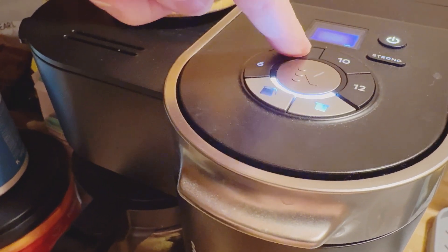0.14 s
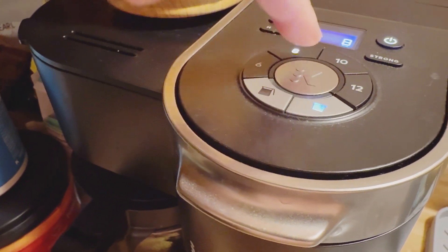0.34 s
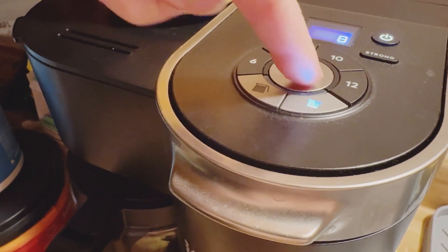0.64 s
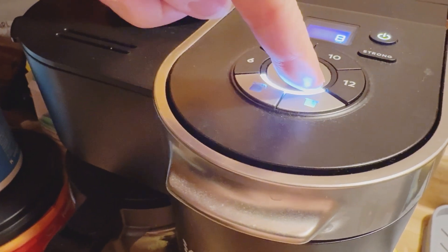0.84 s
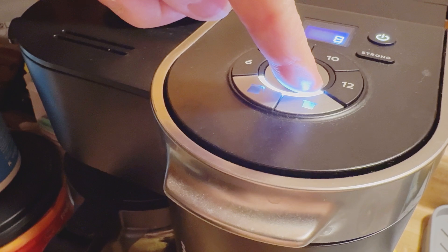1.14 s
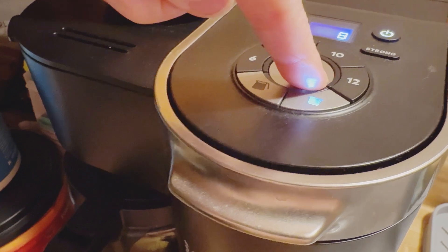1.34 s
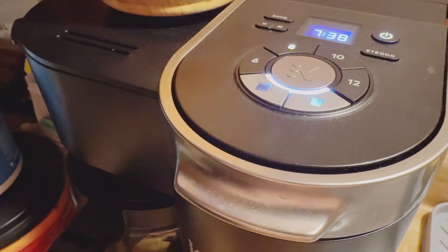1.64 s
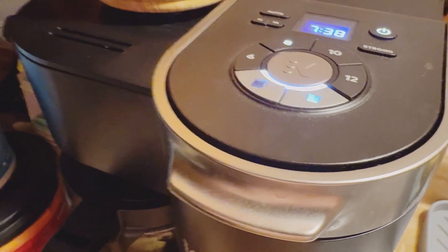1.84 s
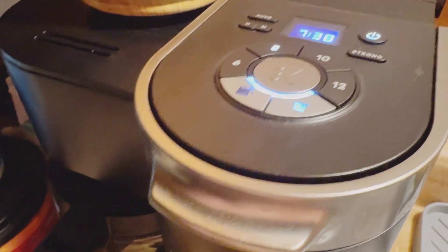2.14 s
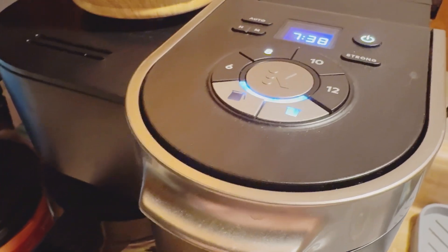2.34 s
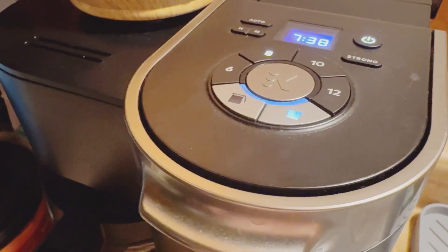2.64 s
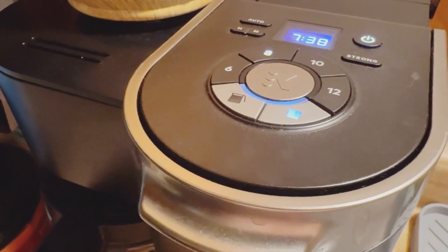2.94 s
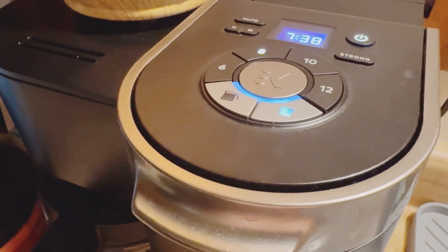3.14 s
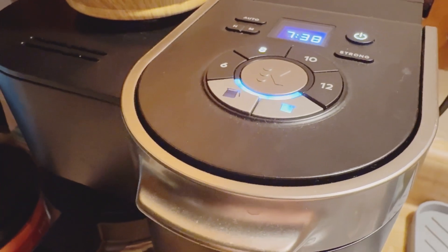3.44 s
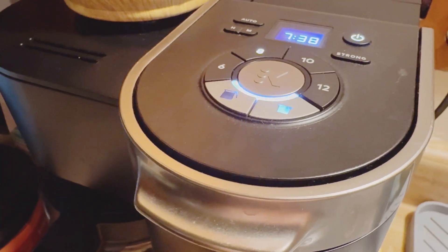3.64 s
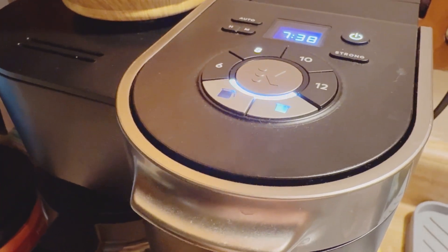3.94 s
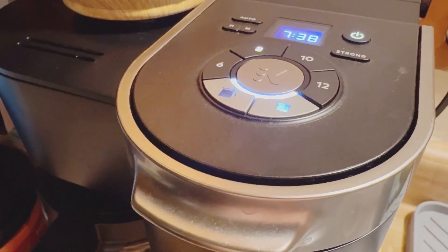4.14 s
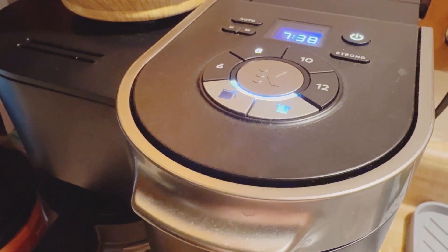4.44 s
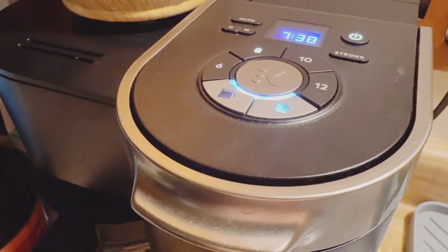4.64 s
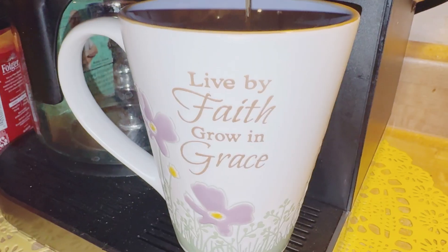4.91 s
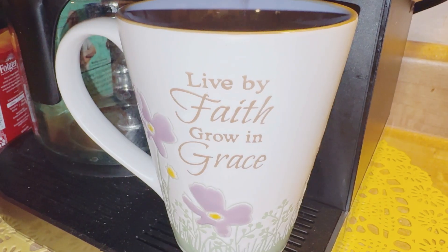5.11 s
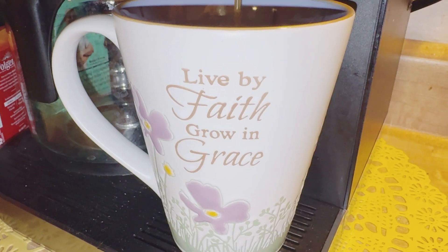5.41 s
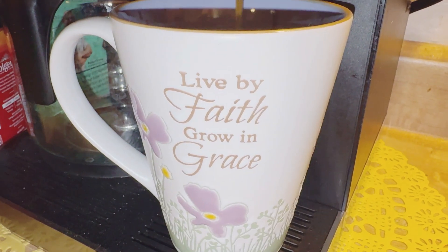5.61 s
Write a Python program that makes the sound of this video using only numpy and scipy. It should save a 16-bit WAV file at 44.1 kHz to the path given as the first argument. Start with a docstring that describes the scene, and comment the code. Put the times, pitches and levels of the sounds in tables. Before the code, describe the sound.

In a quiet kitchen with a fridge humming faintly, two buttons on a single-serve coffee machine are pressed, each snapping with a short plastic knock. A pause follows, with one very soft brush. Then the machine is abruptly brewing: its pump drones, spurts of air gurgle and hiss, and a thin stream of coffee spatters into a mug with a rising hollow note. The stereo microphone is close.

```python
"""A quiet kitchen, a stereo microphone close to a single-serve coffee machine, a fridge humming behind.
First a finger presses two buttons: the switches snap and the plastic housing rings. A soft brush follows.
Near 4.8 s, abruptly, the machine is brewing: its air pump drones, spurts of air gurgle and hiss through
the pod, and a thin stream of coffee spatters into a mug, whose hollow note climbs as it fills."""
import sys
import numpy as np
from scipy import signal
from scipy.fft import rfft, irfft, next_fast_len
from scipy.io import wavfile

SR = 44100
rng = np.random.default_rng(int(sys.argv[2]) if len(sys.argv) > 2 else 0)


def bounce(signal):
    """Save signal as a 16-bit WAV file at the path given by the first command-line argument."""
    frames = np.transpose(np.atleast_2d(signal))
    limited = np.clip(frames, -1, 1)
    pcm = np.round(limited * 32767).astype(np.int16)
    wavfile.write(sys.argv[1], SR, pcm)


N = 254456
TIME, BINS = np.arange(N) / SR, np.fft.rfftfreq(N, 1 / SR)
BREW_START_S, GUSH_S = 4.768, 4.8288

# air pump, the third and sixth shaft orders strongest: (shaft order, level [dB], left-right [dB])
PUMP_ORDERS = [(3, -40.5, -3.5), (5, -48.5, 3.5), (6, -42.5, .5), (8, -64, -7), (9, -60, -4),
               (10, -57.5, 13), (12, -61, -3), (13, -58.5, 16.5), (14, -59, 12), (16, -72, 5),
               (17, -61, -3), (18, -61, 4), (19, -57.5, 2), (20, -61, -6), (21, -57, 7), (24, -52, -2),
               (27, -54, 7), (30, -61, 10), (36, -57, -10), (38, -54.5, 17), (43, -51, 6), (47, -69, 8),
               (49, -56, 6), (52, -56.5, -5)]
# air forced through the pod: (time [s], length [s], cavity gain [dB], needle gain [dB])
AIR_SPURTS = [(4.818, 0.0551, -4, 1), (4.954, .16, 1, 3.5), (5.139, .112, -0.5, 9),
              (5.269, 0.074, -13, 6.5)]
# the pod holder's resonances: (base frequency [Hz], width [Hz], base level [dB])
POD_CAVITIES = [(446, 82, -58), (889, 65, -51.5), (1078, 81, -48), (1360, 60, -45.5), (1554, 57, -43)]
# whistles of air in the pod: (base frequency [Hz], base level [dB], waver [share of pitch])
POD_WHISTLES = [(442.5, -44, 0.0091), (1092, -44.5, 0.00799)]
# rush of the liquid: (frequency [Hz], base density [dB per Hz])
RUSH_SPECTRUM = [(20, -105), (55, -75.5), (150, -82.5), (350, -79), (560, -80.5), (950, -78.5),
                 (1600, -75.5), (2050, -82), (2550, -81.5), (3300, -82.5), (4200, -88), (7200, -91.5),
                 (9000, -85.5), (11200, -93.5), (15500, -88.5)]
# the larger spits and splashes: (time [s], level [dB], bubble pitch [Hz], bubble gain [dB])
LARGE_SPITS = [(4.8288, -26, 1003, -2), (4.9625, -35, 5600, 8), (5.0528, -31, 8500, 0),
               (5.3051, -32.5, 6450, 5), (5.342, -34, 7840, 6), (5.408, -43, 3860, 4), (5.45, -42, 3830, 9),
               (5.572, -32, 8000, -8), (5.6326, -33.5, 4230, -0.5), (5.6531, -33, 4220, 6),
               (5.671, -31, 4200, -2)]
# burbles at the spout: (time [s], length [s], middle pitch [Hz], level [dB])
SPOUT_BURBLES = [(5.335, .10, 1001, -47), (5.445, .11, 1027, -41.5), (5.60, .045, 1062, -45),
                 (5.74, .06, 1015, -42.5)]
# buttons clicking down and springing back: (time [s], blow level [dB], contact cut-off [Hz],
# cap pitch [Hz], cap level [dB], snap level [dB], left-right [dB])
BUTTON_CLICKS = [(0.092, -62.5, 2540, 1490, -51, -68, 3), (0.1353, -38, 3320, 1820, -27.5, -33, 2),
                 (0.1446, -59, 1400, 448, -33, -62, 5), (1.158, -34.5, 2080, 890, -21, -34.5, 2),
                 (1.230, -62, 700, 306, -41, -49, -2), (1.365, -70, 4000, 1950, -49, -53, 11),
                 (1.423, -37.5, 980, 910, -25, -60, 3), (1.437, -48, 1500, 4220, -35.5, -37, 5),
                 (1.459, -58, 3500, 3050, -43, -58, 4), (1.472, -54, 3500, 1890, -47, -45.5, 6.5)]
# the plastic lid and housing: (frequency [Hz], gain [dB], t60 [s])
HOUSING_MODES = [(140.6, -3, 0.067), (186, -3, 0.18), (231.5, -10.5, 0.16), (286.6, -5.5, 0.11),
                 (376, -6.5, 0.048), (477, -6.5, 0.054), (679, -1, 0.063), (750, -1, 0.059),
                 (862, -1.5, 0.029), (1022, -4.5, 0.051), (1055, -7, 0.041), (1250, -3.5, 0.035),
                 (1398, -8, 0.046), (1677, 3, 0.022), (1775, -3.5, 0.033), (1877, -10, 0.051),
                 (2000, -13.5, 0.086), (2505, -6, 0.046), (2636, -6, 0.045), (3150, -17, 0.035),
                 (4320, -18, 0.03)]
# the switch's snap: (frequency [Hz], gain [dB])
SNAP_SPECTRUM = [(1000, -2.5), (3100, 6), (4800, -9), (6800, -22), (8400, 2), (11000, -14), (13800, -5),
                 (16000, -17)]
# the fizz of a spit, of the brush and of the faint crackle: (frequency [Hz], gain [dB])
SPIT_FIZZ = [(800, 3), (3000, -12), (8000, 5), (15000, 1)]
BRUSH_FIZZ = [(4000, -25), (6000, 1), (10000, 5), (14500, -8)]
CRACKLE_FIZZ = [(3000, -39), (6500, -53), (8200, 25), (14500, 8.5)]
# the fridge compressor's drone: (shaft order, level [dB])
DRONE_ORDERS = [(2, -89), (3, -72.5), (4, -56.5), (6, -68), (8, -73.5), (10, -88)]
# the compressor's rasp, with the still air: (frequency [Hz], density [dB per Hz])
RASP_SPECTRUM = [(20, -112), (55, -85.5), (180, -82.5), (300, -92), (450, -106), (1100, -105), (2000, -106),
                 (3150, -105), (3600, -113), (5000, -114), (6200, -122), (7300, -124), (7900, -118),
                 (11000, -120), (15500, -126)]
# the fridge cabinet's faint ringing: (frequency [Hz], level [dB], width [Hz])
CABINET_MODES = [(178, -69.5, 6.9), (656, -83, 17), (954, -80, 30), (1011, -83.5, 19), (1293, -80.5, 14.5),
                 (2600, -80.5, 14), (3150, -82.5, 14), (3242, -76.5, 26), (4200, -90.5, 8.1),
                 (4750, -93, 7.2)]
# the kitchen's decay: (frequency [Hz], t60 [s])
KITCHEN_DECAY = [(150, 0.31), (500, 0.25), (2000, 0.29), (6000, 0.17), (15000, 0.32)]
# how alike noise is at the microphone's two sides: (frequency [Hz], correlation [-1 to 1])
MIC_LIKENESS = [(60, 0.73), (300, 0.93), (650, 0.66), (1400, 0.5), (3000, -0.1), (7000, 0.57)]
# which side is louder: (frequency [Hz], left-right [dB])
MIC_BALANCE = [(100, 1), (200, -0.5), (380, 4.5), (700, 4), (1300, 3), (2400, -3.5), (4400, 6), (8000, 0)]


def pump(turns, wobble_turns=0.0034, flutter=0.15, buzz_db=-66):
    """The air pump's shaft orders drone over a fine buzz; the high ones flutter as the load changes."""
    turns = turns + wobble_turns * drift(8.2)
    listed = {round(order): (db, side_db) for order, db, side_db in PUMP_ORDERS}
    out = np.zeros((2, N))
    for order in range(3, 54):
        db, side_db = listed.get(order, (buzz_db, 1))
        unsteady = 1 + flutter * min(order / 20, 1) * drift(7.2) if order in listed else 1
        phase = 2 * np.pi * rng.random() + np.array([[0], [1]]) * rng.normal() * order / 40
        out += gain_of(db) * panned(side_db) * unsteady * np.sin(2 * np.pi * order * turns + phase)
    return out


def valves(turns, db=-51, sharpness=2):
    """The pump's flap valves let out a puff every turn."""
    puffs = np.exp(sharpness * np.cos(2 * np.pi * turns))
    return gain_of(db) * evened(resonate(mic_noise(), hz=1400, width=650) * puffs)


def spurts(cavity_leak_db=-16.5, needle_leak_db=-6, needle_lead_s=0.018, shape=0.28):
    """Air flow through cavities and needle swells fast and holds; a little leaks between spurts."""
    blow = sum(gain_of(db) * arch(s, length) ** shape for s, length, db, _ in AIR_SPURTS)
    needle = sum(gain_of(db) * arch(s - needle_lead_s, length) ** shape for s, length, _, db in AIR_SPURTS)
    dip = sum(arch(s, length, skew=1.325) for s, length, _, _ in AIR_SPURTS)
    pitch = 1.05 - 0.062 * dip  # a factor that starts high and dips late in each spurt
    return np.hypot(blow, gain_of(cavity_leak_db)), np.hypot(needle, gain_of(needle_leak_db)), pitch


def pod(turns, blow, needle, pitch, sizzle_db=-50, sputter_db=3.5, fizz_db=-61):
    """Air, chuffing with each pump turn, sounds the pod holder's cavities and sizzles at the needle."""
    air = mic_noise()
    chuff = 1 + 0.32 * np.cos(2 * np.pi * turns)
    hollow = sum(gain_of(db) * resonate(air, hz * pitch ** 0.33, width) for hz, width, db in POD_CAVITIES)
    whistles = sum(gain_of(db) * warble(hz * pitch, waver, rate_hz=47) * (1 + 0.15 * drift(50))
                   for hz, db, waver in POD_WHISTLES)
    cavities = (hollow * chuff + whistles) * blow * panned(4)
    needle_tone = np.array([warble(hz=5625, waver=0.01197, rate_hz=298) for side in "LR"])
    sizzle = evened(needle_tone * gain_of(sputter_db * drift(100)))
    fizz = gain_of(fizz_db) * resonate(air, hz=13950, width=250)
    return cavities + gain_of(sizzle_db) * sizzle * needle + fizz


def needle_hiss(needle, db=-57):
    """Around the needle's whistle, the jet of air hisses more broadly."""
    return gain_of(db) * resonate(mic_noise(), hz=6100, width=1900) * needle


def stream(bubbles_per_s=900, spray_db=-53, churn_db=1.4, clump_db=8.5, bands=28):
    """The falling coffee rushes and throws off clumps of tiny bubbles, each a few cycles long."""
    spray, t = np.zeros((2, N)), TIME[:600]
    for hz in np.geomspace(2500, 15000, bands):
        strength = gain_of(1.5 * np.minimum(rng.exponential(1, N), 3))
        births = rng.random(N) < bubbles_per_s / bands / SR
        bubble = np.sin(2 * np.pi * hz * t) * np.exp(-t * hz / 4) * (hz / 8000) ** 0.9
        spray += signal.oaconvolve(strength * births, bubble)[:N] * panned(rng.normal(0, 6.6))
    rush = wash(RUSH_SPECTRUM) * gain_of(churn_db * drift(80))
    clumps = gain_of(clump_db * np.tanh(drift(31)))
    spray = gain_of(spray_db) * evened(spray * clumps)
    return rippled(rush + spray, depth_db=2.4, span_s=0.0072)


def flow(blow, steady_db=-2, gush_db=4.5, gush_decay_s=0.011):
    """How strongly the coffee runs: steady, pushed by the air, with one early gush that dies away."""
    gush = (TIME >= GUSH_S) * np.exp(-abs(TIME - GUSH_S) / gush_decay_s)
    return gain_of(steady_db) * (1 + 0.3 * blow) + gain_of(gush_db) * gush


def spits(small_per_s=20, decay_s=0.0029, room_db=-11):
    """A drop bursts with a short fizz and a few bubbles; small ones fall at random between the large."""
    t, out = TIME[:SR // 25], np.zeros((2, N))
    # same columns as LARGE_SPITS
    small = [(s + rng.random() / small_per_s, rng.normal(-41.5, 3.5), rng.uniform(3900, 11600), -4)
             for s in np.arange(GUSH_S, TIME[-1], 1 / small_per_s)]
    attack = 1 - np.exp(-t / 0.0003)
    for s, db, hz, bubble_db in list(LARGE_SPITS) + small:
        fizz = coloured(rng.standard_normal((2, len(t))), SPIT_FIZZ) * np.exp(-t / decay_s)
        add(out, s, gain_of(db) * (fizz + gain_of(bubble_db) * bubbles(t, hz)) * attack)
    return out + gain_of(room_db) * kitchen(out.mean(0))


def bubbles(t, hz, count=3, scatter=0.14, within_s=0.002, decay_cycles=5):
    """A cluster of tiny bubbles near one pitch, each rising as it dies."""
    pitch = hz * (1 + scatter * np.linspace(-1, 1, count)[:, None] * rng.uniform(0.48, 1, (count, 1)))
    age = np.maximum(t - within_s * rng.random((count, 1)), 0)
    chirps = np.sin(2 * np.pi * pitch * age * (1 + 5 * age))
    return (chirps * np.exp(-age * pitch / decay_cycles)).sum(0) / np.sqrt(count)


def burbles(fall_hz_per_s=996):
    """Each burble at the spout swells and fades while its pitch slides down."""
    hz, level = np.full(N, float(SPOUT_BURBLES[0][2])), np.zeros(N)
    for s, length, middle_hz, db in SPOUT_BURBLES:
        slide = middle_hz - fall_hz_per_s * (np.minimum(TIME - s, length) - length / 2)
        hz = np.where(TIME >= s, slide, hz)
        level += gain_of(db) * arch(s, length)
    return cavity(hz, width=26) * level


def mug_gurgle(start_s=5.28, rise_s=0.24, start_hz=325, climb_hz_per_s=170, db=-50.5):
    """The air left in the mug rings higher as the coffee rises."""
    age = np.maximum(TIME - start_s, 0)
    return gain_of(db) * np.minimum(age / rise_s, 1) * cavity(start_hz + climb_hz_per_s * age, width=38)


def cavity(hz, width):
    """A cavity, half singing and half rushing, whose pitch moves as the liquid stirs it."""
    return evened(resonate(mic_noise(), hz, width) + 0.56 * warble(hz, waver=0.01516, rate_hz=44.3))


def buttons(cap_t60_at_1khz=0.015, snap_t60=0.012, clatter_t60=0.068, clatter_db=-9, room_db=-8):
    """The switch snaps, its cap rings briefly, and the blow spreads through the housing."""
    t, out = TIME[:SR // 4], np.zeros((2, N))
    fall = np.log(1000) * t
    for s, blow_db, contact_hz, cap_hz, cap_db, snap_db, side_db in BUTTON_CLICKS:
        modes = sum((-1) ** k * gain_of(db) / np.hypot(1, (hz / contact_hz) ** 2) * ring(t, hz, t60)
                    for k, (hz, db, t60) in enumerate(HOUSING_MODES))
        # countless weaker modes fill the gaps between the strong ones
        spectrum = [(100, -20), (600, 0), (contact_hz, -2), (3 * contact_hz, -26), (16000, -45)]
        clatter = evened(coloured(rng.standard_normal((2, len(t))), spectrum))
        body = modes + gain_of(clatter_db) * clatter * np.exp(-fall / clatter_t60)
        cap_t60 = cap_t60_at_1khz / np.sqrt(cap_hz / 1000)
        cap = np.sin(2 * np.pi * cap_hz * t) * np.exp(-fall / cap_t60) * (1 - np.exp(-t / 0.00096))
        snap = coloured(rng.standard_normal((2, len(t))), SNAP_SPECTRUM)
        snap *= np.exp(-fall / snap_t60) + 0.091 * np.exp(-fall / 0.077)
        click = gain_of(blow_db) * body + gain_of(cap_db) * cap + gain_of(snap_db) * snap
        add(out, s, click * panned(side_db))
    return out + gain_of(room_db) * kitchen(out.mean(0))


def ring(t, hz, t60, delay_cycles=1.273, rise_cycles=0.83):
    """One mode of the housing; slow bending waves make the low ones start late."""
    age = np.maximum(t - delay_cycles / hz, 0)
    attack = 1 - np.exp(-age * hz / rise_cycles)
    return np.sin(2 * np.pi * hz * age) * np.exp(-np.log(1000) * age / t60) * attack


def dome_ping(s=1.1578, hz=13800, db=-30, decay_s=0.0012):
    """The brew button's metal dome pings as it buckles."""
    out, t = np.zeros((2, N)), TIME[:SR // 50]
    envelope = np.exp(-t / decay_s) * (1 - np.exp(-t / 0.00011))
    add(out, s, gain_of(db) * np.sin(2 * np.pi * hz * t) * envelope)
    return out


def brush(s=2.83, body_db=-60, body_s=0.09, fizz_db=-74, fizz_s=0.054):
    """A soft, dull brushing sound with a little fizz on top."""
    rub = mic_noise()
    body = resonate(rub, hz=320, width=130) * np.exp(-((TIME - s) / body_s) ** 2)
    fizz = evened(coloured(rub, BRUSH_FIZZ)) * np.exp(-((TIME - s) / fizz_s) ** 2)
    return gain_of(body_db) * body + gain_of(fizz_db) * fizz


def fridge(shaft_hz=30.89, waver=0.08, chatter_db=3, uneven_db=2):
    """In the background the compressor drones, and its rasp swells once every turn."""
    turns = shaft_hz * TIME + 0.016 * drift(1.6)
    drone = np.zeros(N)
    for order, db in DRONE_ORDERS:
        tone = np.sqrt(2) * np.sin(2 * np.pi * (round(order) * turns + rng.random()))
        drone += gain_of(db) * tone * (1 + waver * drift(7.5))
    cabinet = sum(gain_of(db) / np.sqrt(np.pi * width / SR) / (1 + 2j * (BINS - hz) / width)
                  for hz, db, width in CABINET_MODES)
    rasp = wash(RASP_SPECTRUM) + irfft(rfft(mic_noise()) * cabinet, N)
    steady = lowpassed(rasp, 1300)  # the room smooths the beat out of the low notes
    beat = evened(gain_of(chatter_db * np.cos(2 * np.pi * (turns - 0.18)) + uneven_db * drift(33)))
    return drone + steady + beat * rippled(rasp - steady, depth_db=1.5, span_s=0.023)


def crackle(db=-83, uneven_db=5):
    """A faint, uneven fizz flickers in the top octave."""
    fizz = coloured(mic_noise(), CRACKLE_FIZZ)
    return gain_of(db) * evened(fizz * gain_of(uneven_db * np.clip(drift(36), -2, 2)))


def kitchen(x):
    """Dense reflections off counter and walls, gone in about a third of a second."""
    hz, t, spectra = signal.stft(rng.standard_normal((2, SR // 2)), SR, nperseg=256)
    decay = gain_of(-60 * t / value_at(KITCHEN_DECAY, hz)[:, None])
    tail = signal.istft(spectra * decay, SR, nperseg=256)[1]
    tail *= np.clip(TIME[:tail.shape[1]] / 0.003 - 0.5, 0, 1)  # arrives just after the direct sound
    return signal.fftconvolve(x[None], tail / np.linalg.norm(tail[0]), axes=1)[:, :N]


def rippled(x, depth_db, span_s):
    """Nearby surfaces comb the sound with peaks and dips, different at each side of the microphone."""
    echoes = rng.standard_normal((2, N)) * np.exp(-TIME / span_s)
    return irfft(rfft(x) * gain_of(depth_db * evened(rfft(echoes).real)), N)


def mic_noise():
    """Near-white noise at the microphone's two sides: alike in the bass, less so in the treble."""
    left, other = rfft(rng.standard_normal((2, N)))
    likeness = np.clip(value_at(MIC_LIKENESS, BINS), -1, 1)
    right = likeness * left + np.sqrt(1 - likeness ** 2) * other
    balance = gain_of(np.outer([0.5, -0.5], value_at(MIC_BALANCE, BINS)))
    return irfft(np.array([left, right]) * balance, N)


def wash(points):
    """Stereo noise with a spectrum given in dB per Hz."""
    return coloured(mic_noise(), points) * np.sqrt(SR / 2)


def warble(hz, waver, rate_hz):
    """A self-sustained whistle of rms one whose pitch never holds still."""
    return np.sqrt(2) * np.sin(2 * np.pi * np.cumsum(hz * (1 + waver * drift(rate_hz))) / SR)


def resonate(x, hz, width):
    """A steep resonance that follows the curve hz, its width in Hz; the result has rms one."""
    carrier = np.exp(2j * np.pi * np.cumsum(hz * np.ones(N)) / SR)
    pole = np.exp(-np.pi * width / SR)
    return evened((carrier * signal.lfilter([1], [1, -2 * pole, pole * pole], x / carrier)).real)


def arch(start, length, skew=1):
    """Rises from zero to one and back over an event; a skew above one peaks late."""
    return abs(np.sin(np.pi * np.clip((TIME - start) / length, 0, 1) ** skew))


def drift(hz):
    """Random motion of rms one, wandering up to about hz times a second."""
    return evened(lowpassed(rng.standard_normal(N), hz))


def lowpassed(x, hz):
    """Rolls off above hz."""
    return irfft(rfft(x) / (1 + (BINS / hz) ** 4), N)


def coloured(x, points):
    """Filters a sound by a spectrum in dB."""
    size = x.shape[-1]
    return irfft(rfft(x) * gain_of(value_at(points, np.fft.rfftfreq(size, 1 / SR))), size)


def value_at(points, hz):
    """A spectrum's value at hz, on a log axis."""
    frequencies, values = np.transpose(points)
    return np.interp(np.log(hz + 1), np.log(frequencies + 1), values)


def add(mix, s, sound):
    """Mixes a short sound in at time s."""
    part = mix[:, round(s * SR):][:, :sound.shape[-1]]
    part += sound[..., :part.shape[1]]


def panned(db):
    """Left and right gains for a level difference."""
    return gain_of(np.array([[db], [-db]]) / 2)


def evened(x):
    """Scales to an rms of one."""
    return x / np.sqrt(np.mean(x ** 2) + 1e-20)


def gain_of(db):
    """Decibels to gain."""
    return 10 ** (np.asarray(db) / 20)


def scene(brew_rise_s=0.022, pump_hz=36.33, sag_hz_per_s=0.2, fridge_duck_db=-6):
    """The quiet kitchen and the buttons, then the brew, under which the fridge is fainter."""
    age = np.maximum(TIME - BREW_START_S, 0)
    brewing = np.minimum(age / brew_rise_s, 1)
    turns = np.cumsum(pump_hz - sag_hz_per_s * age) / SR  # the shaft slows a little under load
    blow, needle, pitch = spurts()
    room = fridge() * gain_of(fridge_duck_db * brewing) + brush() + crackle()
    clicks = buttons() + dome_ping()
    machine = pump(turns) + valves(turns) + pod(turns, blow, needle, pitch) + needle_hiss(needle)
    coffee = burbles() + mug_gurgle() + stream() * flow(blow) + spits()
    return room + clicks + brewing * (machine + coffee)


def record(dry):
    """One microphone port feeds the top octave, inverted and later on the left; then the band limit."""
    crossover_hz, delay_s, edge_hz = 7000, 0.000317, 15750
    size = next_fast_len(N + SR)
    hz = np.fft.rfftfreq(size, 1 / SR)
    left, right = rfft(dry, size)
    blend = np.clip((hz - crossover_hz) / 800, 0, 1) * np.pi / 2
    late = -right * np.exp(-2j * np.pi * hz * delay_s)
    left = np.cos(blend) * left + np.sin(blend) * late
    channels = irfft(np.array([left, right]), size)[:, :N]
    band_limit = signal.firwin(701, edge_hz, window=("kaiser", 9), fs=SR)
    return signal.oaconvolve(channels, band_limit[None], "same")


dry = scene()
out = record(dry)
bounce(out)
```